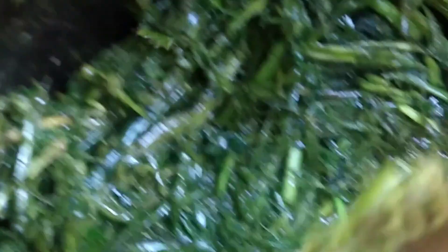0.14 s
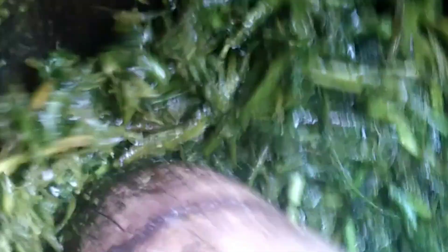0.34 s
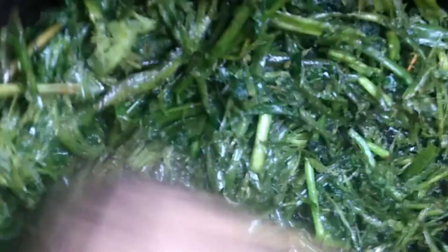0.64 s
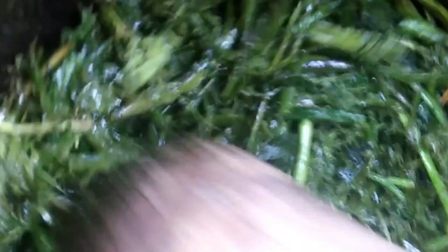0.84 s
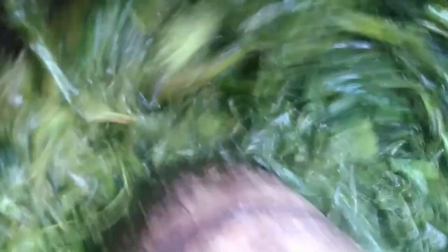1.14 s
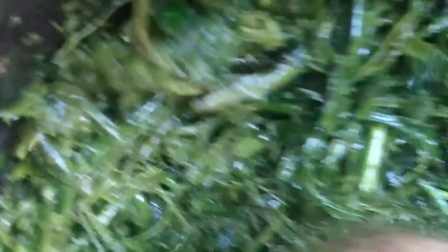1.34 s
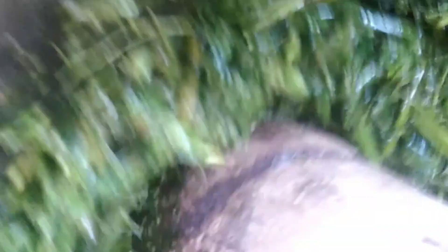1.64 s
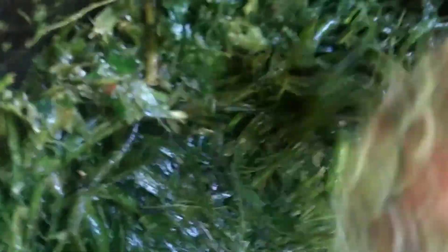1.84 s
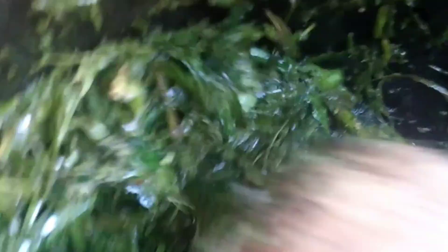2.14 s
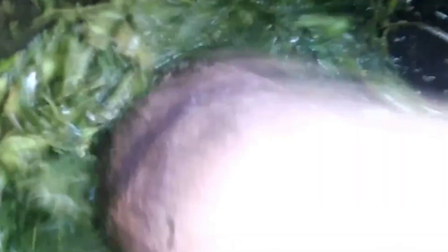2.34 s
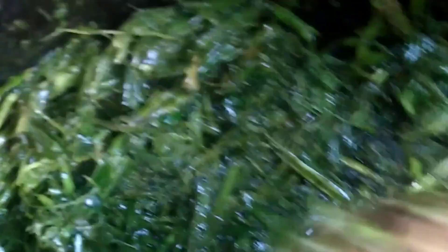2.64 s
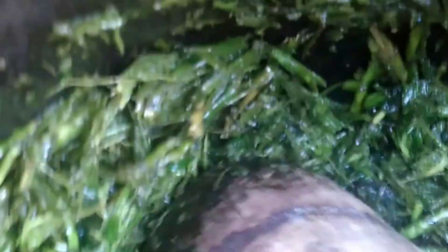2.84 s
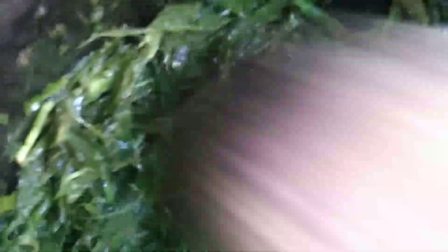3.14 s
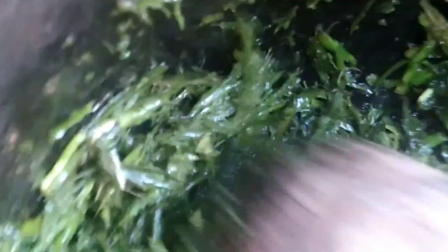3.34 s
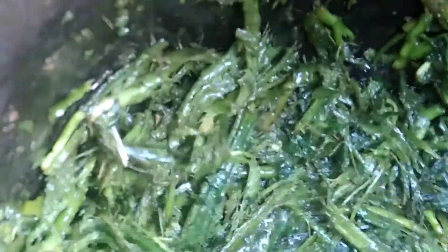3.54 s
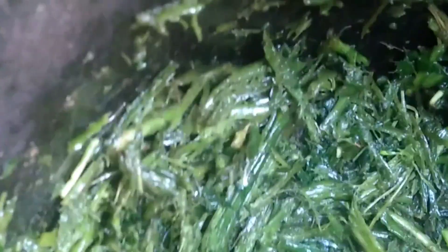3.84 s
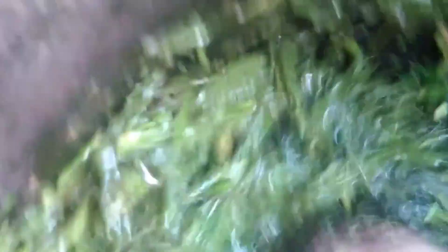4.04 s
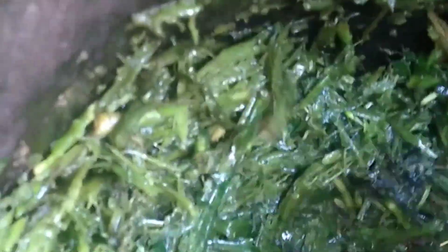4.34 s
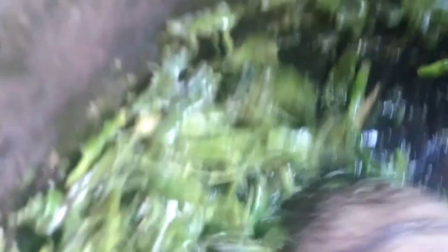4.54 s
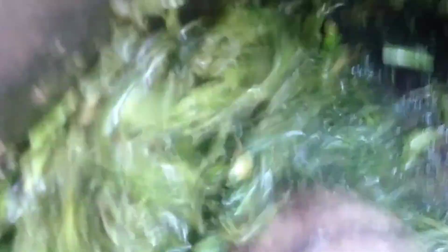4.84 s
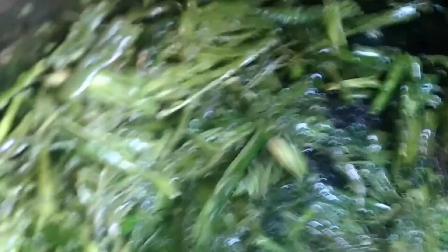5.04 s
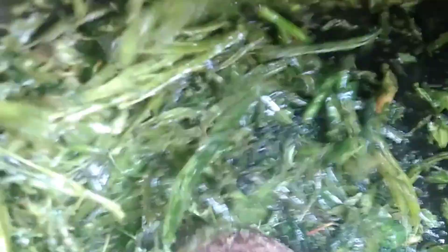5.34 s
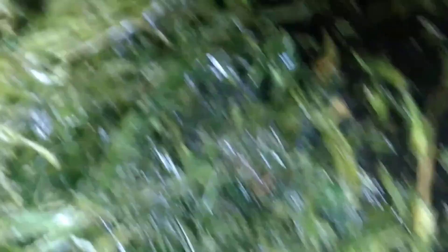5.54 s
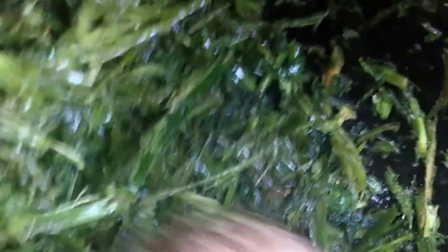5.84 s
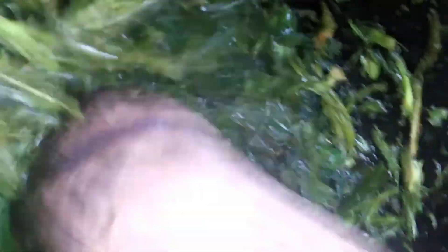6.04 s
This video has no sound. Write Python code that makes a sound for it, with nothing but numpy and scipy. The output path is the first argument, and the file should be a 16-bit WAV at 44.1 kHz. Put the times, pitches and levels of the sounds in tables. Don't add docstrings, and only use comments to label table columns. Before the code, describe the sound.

Outdoors, a wooden pestle pounds wet leaves in a mortar right under a phone microphone. About every 0.4 seconds a deep thump and short, dull bowl knock come with a crisp, juicy crunch, then a faint squelch as the pestle lifts. Small air puffs rumble on the microphone, the loudest hits distort slightly, and soft bird notes and hen clucks sound far behind.

```python
import sys
import numpy as np
from scipy import signal
from scipy.io import wavfile
from scipy.ndimage import uniform_filter1d

SR = 44100
rng = np.random.default_rng(int(sys.argv[2]) if len(sys.argv) > 2 else 0)


def file_out(sig):
    cols = np.atleast_2d(sig).T
    lim = np.clip(cols, -1, 1)
    pcm = np.round(lim * 32767).astype(np.int16)
    wavfile.write(sys.argv[1], SR, pcm)


def elevation(decibels):
    levels = np.asarray(decibels, float)
    return 10 ** (levels / 20)


N = 272538
T = np.arange(N) / SR

# frequency in Hz, level in dB per Hz.
AIR_COLOUR = [(88, -33), (150, -11), (324, -9.5), (535, -27.5), (714, -13), (991, -31.5), (1230, -24),
              (1490, -26), (3470, -25.5), (13600, -42.5), (15000, -45.5)]
# start in seconds, length in seconds, first and last pitch in Hz, level in dB.
COOS = [(.04, .07, 1200, 1150, -53), (.26, .06, 1090, 1090, -57), (.43, .4, 700, 705, -56),
        (.43, .07, 1220, 1200, -54), (.5, .12, 460, 440, -62), (.65, .19, 885, 840, -44),
        (.96, .03, 1240, 1225, -56), (1.015, .055, 1225, 1235, -55), (2.35, .1, 873, 810, -50.5),
        (3.4, .055, 700, 670, -52), (3.92, .071, 860, 860, -57), (4.28, .04, 690, 680, -58),
        (4.32, .1, 850, 840, -66), (4.63, .12, 1250, 1230, -61), (4.72, .08, 1570, 1640, -59),
        (5.075, .16, 1240, 1225, -63), (5.42, .14, 1240, 1220, -59), (5.49, .09, 1130, 1050, -57),
        (5.62, .08, 700, 680, -70)]
# start in seconds, length in seconds, pitch in Hz, level in dB.
CLUCKS = [(0.143, 0.027, 617, -67.5), (0.869, 0.016, 604, -55.5), (0.935, 0.051, 644, -72),
          (1.01, 0.053, 630, -75), (1.418, 0.028, 607, -69), (4.683, 0.04, 626, -71),
          (5.08, 0.034, 609, -67), (5.587, 0.041, 612, -68.5), (5.93, 0.032, 618, -67)]
CLUCK_HARMONICS_DB = [-14, 24, 14.5, -25]
# loudest moment in seconds, half width in seconds, pitch and width in Hz, level in dB.
HUM = (4, 0.75, 215.5, 26.5, -55)
# peak in seconds, peak level in dB, half width in ms.
PUSHES = [(0.14, -25, 1.26), (1.476, -27.5, 1.26), (1.493, -32, 0.8), (1.514, -32.5, 0.87),
          (1.564, -28.5, 0.75), (1.807, -31, 0.76), (1.889, -32.5, 1.75), (2.201, -34.5, 0.75),
          (2.272, -29.5, 1.2), (2.291, -31.5, 0.78), (2.33, -23, 1.52), (2.694, -30, 0.8),
          (3.067, -33, 0.97), (3.147, -32, 0.83), (3.185, -31, 0.85), (3.193, -32.5, 0.89),
          (3.448, -38, 0.88), (3.637, -32, 0.77), (4.731, -29, 0.45), (4.747, -18.5, 0.81),
          (4.774, -17.5, 0.82), (4.786, -17, 0.93), (4.814, -25.5, 0.45), (4.823, -26.5, 0.59),
          (4.887, -20, 1), (4.912, -22.5, 0.39), (5.036, -21, 1.15), (5.135, -31, 1.1), (5.147, -28, 0.86)]
# peak in seconds,
# peak level in dB, half width in ms.
PULLS = [(1.501, -29.5, 0.67), (2.615, -26.5, 0.91), (4.783, -30, 0.37), (5.019, -12, 0.51),
         (5.028, -17.5, 0.89)]
# passing time in seconds, level in dB, half width in seconds.
WAKES = [(0.202, -34, 0.14), (0.579, -42.5, 0.11), (1.531, -29, 0.078), (1.832, -32.5, 0.12),
         (2.28, -33.5, 0.084), (2.66, -28, 0.049), (3.08, -35, 0.24), (3.251, -27, 0.064),
         (3.669, -34.5, 0.046), (3.949, -43.5, 0.14), (4.265, -18, 0.03), (4.359, -31.5, 0.07),
         (4.74, -26, 0.13), (5.13, -35, 0.11), (5.62, -46.5, 0.044), (6.02, -41.5, 0.021)]
CRACKLE_HZ = [1800, 2800, 3900]
# start in seconds, low ring, main ring and pestle knock in dB,
# share of the free ringing time that the pulp leaves, 0 to 1.
BLOWS = [(-.055, -20, -16.5, -16, 0.52), (0.361, -32, -24, -26, 0.66), (0.779, -32, -38, -30.5, 0.94),
         (1.2, -29.5, -14.5, -26.5, 0.46), (1.615, -28, -21.5, -30.5, 0.56), (2.004, -48, -38, -36, 0.8),
         (2.439, -22.5, -16.5, -17, 0.47), (2.858, -19, -21, -32, 0.69), (3.261, -17, -19.5, -32, 0.46),
         (3.698, -10.5, -17.5, -51, 0.34), (4.109, -25.5, -13.5, -30.5, 0.68),
         (4.126, -23, -15.5, -46, 0.83), (4.508, -23.5, -17, -21.5, 0.65), (4.536, -20.5, -34, -39.5, 1),
         (4.927, -33.5, -37.5, -55, 0.41), (5.347, -34, -53, -53, 0.02), (5.748, -26.5, -34.5, -57, 0.73),
         (6.158, -27, -44.5, -44, 0.46)]
# frequency in Hz, time to fall 60 dB in seconds, rise in seconds.
RINGS = [
    (205.5, 0.13, 0.0015),
    (331, 0.23, 0.00052),
    (850, 0.11, 0.0046),
]
# start in seconds, level in dB, frequency in Hz, 60 dB decay in seconds.
THUMPS = [(-.0105, -11, 59.7, 0.1), (0.36, -15.5, 71.2, 0.082), (0.78, -8.5, 98.6, 0.05),
          (1.196, -5.5, 75.5, 0.074), (1.615, -10, 75.4, 0.066), (2.007, -24.5, 80.7, 0.17),
          (2.438, -8, 79, 0.092), (2.859, -0.5, 75.4, 0.063), (3.262, -11, 94, 0.079),
          (3.697, -6, 82.2, 0.084), (4.109, -16, 98, 0.11), (4.129, -8.5, 53, 0.084),
          (4.505, -25, 87, 0.089), (4.533, -31.5, 99.6, 0.061), (4.926, -4, 102.2, 0.026),
          (5.347, -15, 76.3, 0.077), (5.747, -13, 72.7, 0.065), (6.155, -10.5, 85.7, 0.074)]
# time in seconds, ring in Hz, level in dB.
STEM_BURSTS = [(0.3631, 2300, -15), (0.3632, 3280, -10.5), (0.3636, 1880, -16), (0.3677, 850, -13.5),
               (0.7788, 1940, -21), (0.7847, 4300, -17), (0.7847, 3460, -19), (0.789, 2930, -25),
               (1.2007, 4320, -9), (1.1973, 5183, -10), (1.2014, 2950, -10), (1.1986, 3890, -7.5),
               (1.6138, 1940, -16.5), (1.6147, 3110, -14), (1.6196, 2340, -18.5), (1.6174, 4190, -13),
               (2.0088, 3266, -8), (2.0104, 2487, -4), (2.0115, 2007, -7), (2.0143, 3194, -9.5),
               (2.44, 3090, -8.5), (2.4405, 2195, -7.5), (2.4429, 1710, -13), (2.4441, 3760, -8.5),
               (2.858, 1595, -30), (2.859, 2310, -10), (2.8613, 4350, -16.5), (2.862, 3220, -10.5),
               (3.2646, 1156, -11.5), (3.2663, 3730, -9.5), (3.2704, 3040, -12.5), (3.2805, 3455, -7),
               (3.6986, 2645, -11.5), (3.6997, 3270, -4), (3.7028, 3830, -9.5), (3.71, 3790, -6),
               (4.1084, 1530, -17), (4.1104, 2400, -34.5), (4.1107, 3150, -25), (4.111, 3670, -17),
               (4.5115, 1380, -20), (4.5102, 924, -6.5), (4.5105, 3700, -16.5), (4.5222, 912, -17),
               (4.93, 3977, -9.5), (4.9308, 2990, -19), (4.9377, 3380, -9), (4.9413, 4210, -15),
               (5.3505, 2840, -13), (5.3543, 3920, -12.5), (5.364, 1695, -19.5), (5.3664, 3060, -25),
               (5.7479, 3470, -12.5), (5.7525, 2890, -12), (5.7543, 4170, -20), (5.7596, 3910, -23),
               (6.157, 2850, -6), (6.1602, 3960, -5), (6.168, 2845, -6.5), (6.166, 3750, -13)]
# time in seconds, ring in Hz, level in dB.
WEAK_POPS = [(0.0268, 1230, -31), (0.0355, 1300, -31.5), (0.038, 1750, -31), (0.39, 4020, -17.5),
             (0.3956, 3900, -21), (0.445, 1210, -35.5), (0.447, 1820, -40), (0.784, 1500, -20),
             (0.8064, 2960, -12), (0.8094, 4280, -15.5), (0.868, 1250, -32), (0.899, 940, -31),
             (1.2203, 3580, -22.5), (1.221, 2600, -20.5), (1.2906, 1280, -35), (1.308, 2450, -35),
             (1.6394, 2440, -24), (1.6448, 3050, -21.5), (1.7205, 1230, -31), (1.7194, 1560, -28),
             (2.0354, 3080, -23), (2.0459, 2890, -26.5), (2.126, 1760, -29), (2.125, 2480, -28),
             (2.4699, 2330, -16.5), (2.4749, 2760, -23.5), (2.5507, 1980, -36), (2.552, 3070, -36),
             (2.885, 1270, -24.5), (2.8844, 2830, -28.5), (2.9662, 960, -35.5), (2.9693, 2150, -46),
             (3.2895, 3300, -33), (3.2945, 2280, -21.5), (3.375, 1980, -26), (3.3745, 2680, -26.5),
             (3.721, 1380, -24), (3.7235, 2140, -22), (3.7956, 1910, -34), (3.8087, 1740, -37),
             (4.1312, 1270, -24), (4.1336, 3040, -21), (4.199, 2190, -36), (4.2176, 1795, -32),
             (4.531, 3780, -23), (4.5317, 1400, -25), (4.5995, 1496, -30.5), (4.625, 2560, -38),
             (4.9543, 2610, -23.5), (4.9567, 3320, -22), (5.0333, 1830, -33.5), (5.036, 1800, -35),
             (5.3728, 3900, -18), (5.3813, 3080, -15), (5.4671, 1290, -36), (5.472, 2620, -33.5),
             (5.781, 3240, -25), (5.7826, 1050, -27.5), (5.8562, 3270, -38), (5.867, 1220, -36)]
# frequency in Hz, level in dB per Hz.
PULP_COLOUR = [(240, -29), (400, -3.5), (473, -22), (602, -24), (828, -7.5), (979, -18.5), (1170, -9),
               (3770, -9), (5860, -23.5), (13700, -29.5), (15000, -42)]
# start in seconds, level in dB.
BRUSHES = [(0.34, -39.5), (.76, -37.5), (1.185, -38.5), (1.594, -36), (1.989, -31.5), (2.427, -33),
           (2.846, -36), (3.252, -37), (3.686, -36), (4.1, -30), (4.5, -43), (4.89, -51), (5.332, -31.5),
           (5.728, -35.5), (6.141, -32)]
# time in seconds, peak level in dB, treble against it in dB.
TICKS = [(0.157, -41, -20.5), (0.507, -40, -18), (0.936, -39.5, -28.5), (0.957, -36, -30.5),
         (1.423, -35.5, -13), (1.989, -17.5, -10), (2.122, -17.5, -27.5), (2.316, -51.5, -27),
         (2.361, -50.5, -23), (2.678, -54, -15), (2.758, -41.5, -30), (2.814, -50, -20), (3.039, -36, -26),
         (4.176, -21, -43), (4.651, -29, -29.5), (4.257, -40, -33), (4.6934, -35.5, -19), (5.003, -28, -31),
         (5.084, -37, -7), (5.433, -23.5, -25), (5.5852, -39.5, -13), (5.6135, -45.5, -17),
         (5.9182, -37, -25.5)]
# peak in seconds, level in dB, treble against it in dB,
# rise in seconds, 60 dB decay in seconds.
IMPACTS = [(-.01, -31, -21, .004, 0.19), (.364, -7.5, -15.5, 0.0055, 0.056), (.782, -7, -12, 0.0039, 0.072),
           (1.199, -1, -7, 0.0036, 0.034), (1.617, -7, -14.5, 0.0048, 0.053), (2.009, 0, -15, 0.003, 0.048),
           (2.441, -3, -13.5, 0.0051, 0.046), (2.86, -8, -14.5, 0.0047, 0.042),
           (3.268, -2, -11, 0.0053, 0.045), (3.28, -6.5, -25, 0.0084, 0.028),
           (3.7, 0.5, -12.5, 0.0034, 0.034), (3.709, -8.5, -26, 0.0022, .03),
           (4.11, -9, -26.5, 0.0031, 0.0072), (4.131, -24.5, -26.5, 0.012, 0.17),
           (4.508, -14, -13, 0.0031, 0.11), (4.911, -37, -4.5, 0.0033, 0.27),
           (4.935, -10, -23, 0.01, 0.092), (5.35, -10.5, -29.5, 0.0047, 0.045),
           (5.371, -11, -24.5, 0.0078, 0.069), (5.753, -8, -16.5, 0.0077, 0.043),
           (6.161, -0.5, -19, 0.0051, 0.05)]
# peak in seconds, level in dB, delay of the ooze in seconds,
# ooze against it in dB.
SQUEEZES = [(0.39, -17, 0.024, -14.5), (0.801, -13, 0.012, -24), (1.221, -14.5, 0.014, -15.5),
            (1.643, -22, 0.026, -10), (2.035, -21, 0.015, -8), (2.471, -22.5, 0.0077, -17.5),
            (2.882, -21, 0.03, -10), (3.293, -22, 0.015, -30), (3.724, -25.5, .014, -4),
            (4.53, -21.5, 0.014, -4.5), (5.405, -54, 0.03, 2), (5.781, -25, 0.021, -26)]
# peak in seconds, level in dB, rise in seconds,
# 60 dB decay in seconds, how much earlier it starts to let go in seconds.
LIFTS = [(0.033, -33.5, 0.0064, 0.17, 0.047), (.444, -41, 0.0085, 0.16, 0.02),
         (0.899, -33, 0.019, 0.073, 0.029), (1.306, -34, 0.0063, 0.11, 0.018),
         (1.726, -29, 0.016, 0.1, 0.0048), (2.122, -31.5, 0.00054, 0.14, 0.0088),
         (2.555, -32.5, 0.011, 0.051, 0.015), (2.973, -32, 0.008, 0.061, 0.022),
         (3.378, -27, 0.0027, 0.084, 0.013), (3.808, -34, 0.0096, 0.064, 0.024),
         (4.214, -32, 0.016, 0.083, 0.022), (4.626, -31, 0.014, 0.14, 0.039),
         (5.038, -32, 0.013, 0.093, 0.03), (5.47, -37.5, 0.014, 0.19, 0.017),
         (5.868, -38, 0.031, 0.11, 0.029)]
CRUNCH_BRIGHT_DB = [-11.5, 2.5, 7, 7.5, 1, 4.5, 6.5, 2.5, 4.5, 4.5, -6, -2, -8, 4, 5, 11.5, 6.5, 4]
SUCK_BRIGHT_DB = [-5.5, 3.5, -4.5, -9, -8.5, -6.5, -14.5, -1.5, -6.5, -13.5, -6, -9.5, -5.5, -8.5, -13.5,
                  -4, 1, -3]
SIDE_DB = [-12, -63, -31, -31.5, -36, -22, -59.5, -12, -13, -11.5, 7, -9.5, -15.5, -7, -10, -12, -11.5, -5]

BLOW_S = np.array(BLOWS)[:, 0]


def level(x, db):
    return x * elevation(db) / np.sqrt(np.mean(x ** 2))


def colour_db(table, hz):
    table_hz, db = np.transpose(table)
    return np.interp(np.log(hz), np.log(table_hz), db)


def band(x, hz, width):
    return signal.lfilter(*signal.iirpeak(min(hz, .45 * SR), hz / width, fs=SR), x)


def add(out, s, sound):
    i = int(round(s * SR))
    part = sound[max(-i, 0):max(N - i, 0)]
    out[max(i, 0):max(i, 0) + len(part)] += part


def walk(rate):
    hold = int(SR / rate)
    steps = np.repeat(rng.standard_normal(N // hold + 1), hold)
    smooth = uniform_filter1d(uniform_filter1d(steps, hold), hold)[:N]
    return smooth / np.std(smooth)


def fade(t, t60):
    return np.exp(-np.log(1000) * t / t60)


def sine(hz, t):
    return np.sin(2 * np.pi * hz * t)


def stroke():
    return np.searchsorted(BLOW_S - .03, T) - 1


def after_blow():
    latest = BLOW_S[np.searchsorted(BLOW_S, T) - 1]
    return np.exp(-(T - latest) / 0.14)


def air():
    out = 0
    for hz in 180 * 2 ** np.arange(0, 6.4, 1 / 3):
        db = colour_db(AIR_COLOUR, hz) + 10 * np.log10(hz) + 1.9 * walk(8.6) + 2.5 * walk(50)
        strip = band(band(rng.standard_normal(N), hz, hz / 3), hz, hz)
        out = out + level(strip, 0) * elevation(db)
    return level(out, -66)


def birds():
    coos, clucks = np.zeros(N), np.zeros(N)
    for s, length, first_hz, last_hz, db in COOS:
        t = T[:int(length * SR)]
        glide_hz = first_hz + (last_hz - first_hz) * t / length / 2
        add(coos, s, elevation(db) * np.sin(np.pi * t / length) ** 0.5 * sine(glide_hz, t))
    for s, length, hz, db in CLUCKS:
        t = T[:int(length * SR)]
        voice = sum(elevation(g) * sine((k + 1) * hz, t) for k, g in enumerate(CLUCK_HARMONICS_DB))
        add(clucks, s, elevation(db) * np.sin(np.pi * t / length) ** 0.14 * voice)
    coos = np.interp(T + .00015 * walk(37), T, coos)
    hoarse = clucks * (1 + walk(150)) / 2
    return coos * elevation(2 * walk(60) - 2) + hoarse * elevation(-4.0)


def hum():
    s, half_width_s, hz, width_hz, db = HUM
    drone = level(band(rng.standard_normal(N), hz, width_hz), db)
    return drone * np.exp(-((T - s) / half_width_s) ** 4)


def draught():
    power, t = np.full(N, elevation(2 * -57.5)), T[:SR // 2]
    for s, db, _, _ in THUMPS:
        strength = elevation(-12.5 + 0.66 * min(db, -3))
        stir = strength * (1 - np.exp(-(t / 0.029) ** 2)) * fade(t, 0.4)
        add(power, s, stir ** 2)
    for s, db, half_width_s in WAKES:
        power += elevation(2 * db) * np.exp(-2 * ((T - s) / half_width_s) ** 2)
    return np.sqrt(power)


def wind():
    lowpass = signal.butter(4, 130, fs=SR, output="sos")
    rumble = signal.sosfilt(lowpass, band(rng.standard_normal(N), 56, 50))
    out = level(rumble, 0) * draught() * elevation(2.4 * walk(30))
    for way, puffs in ((1, PUSHES), (-0.65, PULLS)):
        for s, db, width_ms in puffs:
            u = (T[:SR // 25] - .01) / (.0013 * width_ms)
            add(out, s - .01, way * elevation(db + 10.5) * np.exp(-u ** 2 / 2))
    return out


def microphone_hiss():
    hiss = level(band(rng.standard_normal(N), 12500, 5500), -74)
    return hiss * elevation(6.4 * after_blow() + 1.2 * walk(14) + 1.5 * walk(90))


def hollow():
    tone = level(band(rng.standard_normal(N), 1250, 45), -81)
    return tone * elevation(24 * after_blow() + 3 * walk(9))


def crackle():
    out = 0
    for hz in CRACKLE_HZ:
        present = rng.random(N) < 300 / SR
        clicks = present * rng.standard_normal(N) * elevation(1.5 * rng.exponential(size=N))
        out = out + band(band(clicks, hz, hz / 6), hz, hz / 2)
    return level(out, -77) * elevation(24 * after_blow())


def yard(x, t60, wet_db, top_hz):
    t = T[:SR // 2]
    scatter = rng.standard_normal(len(t)) * fade(t, t60)
    tail = signal.lfilter(*signal.butter(1, top_hz, fs=SR), scatter)
    return signal.fftconvolve(x, tail * elevation(wet_db) / np.sqrt(np.sum(tail ** 2)))[:N]


def murmur(crush):
    strength = np.abs(uniform_filter1d(crush ** 2, size=256)) ** 0.37
    shaken = strength * rng.standard_normal(N)
    out = elevation(8.0) * band(shaken, 334, 43)
    out += elevation(-2.5) * band(shaken, 205, 9.9)
    out += elevation(-0.5) * band(shaken, 850, 60)
    main_db = np.array(BLOWS)[stroke(), 2]
    return out * elevation(0.18 * (main_db + 21.5))


def bowl():
    out, t = np.zeros(N), T[:SR // 2]
    for s, *strength_db, free in BLOWS:
        for db, (hz, t60, rise) in zip(strength_db, RINGS):
            decay = fade(t, t60 * free) + elevation(-19.5) * fade(t, 2.7 * t60 * free)
            add(out, s, elevation(db + 10.5) * (1 - np.exp(-t / rise)) * decay * sine(hz, t + s))
            twin = (1 - np.exp(-t / .02)) * fade(t, 2 * t60 * free) * sine(0.71 * hz, t)
            add(out, s, elevation(db + 14.0 - 18.5) * twin)
        belly = (1 - np.exp(-t / .004)) * fade(t, .5 * free) * sine(280, t + s)
        add(out, s, elevation(strength_db[1] - 17) * belly)
        split = fade(t, 0.018 * free) * sine(780, t)
        add(out, s, elevation(strength_db[-1] + 10) * split)
    for s, db, hz, t60 in THUMPS:
        add(out, s, elevation(db + 10.5) * (1 - np.exp(-(t / 0.0079) ** 2)) * fade(t, t60) * sine(hz, t))
    rocking = walk(50)
    out = np.interp(T + .0003 * uniform_filter1d(rocking, size=600), T, out)
    return out * elevation(rocking)


def pops():
    out, t, rise_s = np.zeros(N), T[:SR // 30], .0015
    shape = (1 - np.exp(-(t / rise_s) ** 2)) * fade(t, .018)
    shape = shape / shape.max()
    for s, hz, db in STEM_BURSTS + WEAK_POPS:
        ring = np.sin(2 * np.pi * (hz * t + rng.random()))
        add(out, s - 2 * rise_s, elevation(db + 2) * shape * ring)
    return out


def snaps(lo_hz, hi_hz, per_s, spread_db, sharp):
    out, count = np.zeros(N), per_s * N // SR
    for hz in lo_hz * 2 ** np.arange(0, np.log2(hi_hz / lo_hz), 1 / 4):
        clicks = np.zeros(N)
        sizes = rng.standard_normal(count) * elevation(spread_db * rng.exponential(size=count))
        clicks[rng.integers(N, size=count)] = sizes
        ring = band(band(clicks, hz, hz / sharp), hz, hz / 2)
        patchy = elevation(2.2 * walk(35))
        out += level(ring * patchy, colour_db(PULP_COLOUR, hz) + 10 * np.log10(hz))
    return level(out, 0)


def brighten(x):
    low = signal.sosfiltfilt(signal.butter(1, 2300, fs=SR, output="sos"), x)
    blow = stroke()
    sucking = T - BLOW_S[blow] > .075
    tilt_db = np.where(sucking, np.array(SUCK_BRIGHT_DB)[blow], np.array(CRUNCH_BRIGHT_DB)[blow])
    tilt = uniform_filter1d(elevation(tilt_db / 2), size=512)
    return low / tilt + (x - low) * tilt


def pulp_bursts():
    bursts = list(IMPACTS)
    for s, db in BRUSHES:
        bursts.append((s + 0.0097, db + 0.5, -1, 0.0091, 0.052))
        bursts.append((s + 0.028, db - 6, -7, 0.025, .04))
    for s, db, later, ooze_db in SQUEEZES:
        bursts.append((s, db, -36.5, 0.01, 0.074))
        bursts.append((s + later, db + ooze_db, -36.5, 0.01, 0.069))
    for s, db, rise, t60, earlier in LIFTS:
        bursts.append((s - earlier, db - 4.5, -26, 0.0055, .11))
        bursts.append((s, db, -26, rise, t60))
    for s, db, treble_db in TICKS:
        bursts.append((s + 0.0017, db - 10.0, treble_db, .001, .05))
    return bursts


def pulp():
    body, spit, t = np.zeros(N), np.zeros(N), T[:SR // 3]
    for s, db, treble_db, rise, t60 in pulp_bursts():
        rise = max(rise, .0005)
        lead = t[:int(rise * 3 * SR)]
        swell = np.exp(-(lead[::-1] / rise) ** 2)
        start = s - lead[-1]
        add(body, start, elevation(2 * db) * np.r_[swell, fade(t, t60)] ** 2)
        spit_decay = fade(t, .6 * t60) + elevation(-20) * fade(t, 3.0 * t60)
        add(spit, start, elevation(2 * (db + treble_db)) * np.r_[swell, spit_decay] ** 2)
    crunch = brighten(snaps(450, 6500, per_s=4000, spread_db=1.5, sharp=5))
    fizz = snaps(6500, 14500, per_s=4000, spread_db=2, sharp=4)
    clumps = elevation(-2.0 + walk(110))
    return np.sqrt(body) * clumps * crunch + np.sqrt(spit) * elevation(-3.0) * fizz


def side_hiss(mid):
    out, blow = 0, stroke()
    landing = np.abs(T - BLOW_S[blow] - .01) < .035
    for hz in np.arange(4300, 14000, 1200):
        strip = signal.butter(3, [hz, hz + 1200], "band", fs=SR, output="sos")
        strength = np.sqrt(np.abs(uniform_filter1d(signal.sosfilt(strip, mid) ** 2, size=1024)))
        present = (strength < elevation(-40)) * (walk(22) > max(3 - hz / 2100, -.6))
        landing_gain = elevation(np.array(SIDE_DB)[blow] + 0.6 * hz / 1000 + 1.0)
        present = np.where(landing, landing_gain, present)
        noise = level(signal.sosfilt(strip, rng.standard_normal(N)), -6)
        out = out + strength * present * noise
    return out


def scene():
    crush = pulp()
    far = air() * elevation(23.0 * after_blow() + 0.26 + walk(33)) + birds() + hum()
    near = wind() + microphone_hiss() + hollow() + crackle()
    blows = bowl() + murmur(crush) + pops() + crush
    mid = far + near + blows + yard(crush, t60=0.38, wet_db=-28.5, top_hz=3500)
    side = side_hiss(mid)
    return np.array([mid + side, mid - side])


def band_limit(x):
    return signal.sosfilt(signal.butter(12, 15600, fs=SR, output="sos"), x)


def record(dry):
    x = signal.sosfilt(signal.butter(3, 50, "high", fs=SR, output="sos"), dry)
    x = x / (1 + (x / 1.06) ** 4) ** .25
    x = signal.sosfilt(signal.ellip(10, .2, 80, 14250, fs=SR, output="sos"), x)
    return band_limit(x)


dry = scene()
out = record(dry)
file_out(out)
```